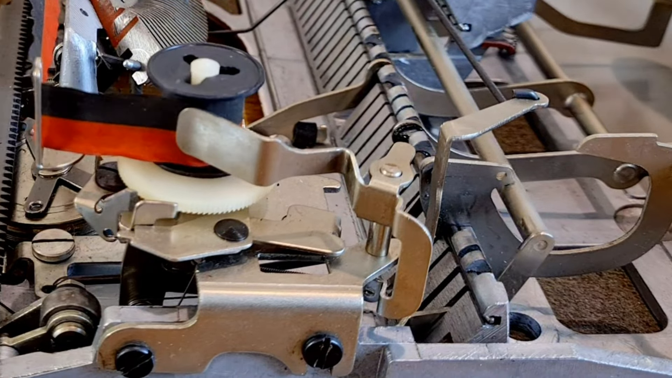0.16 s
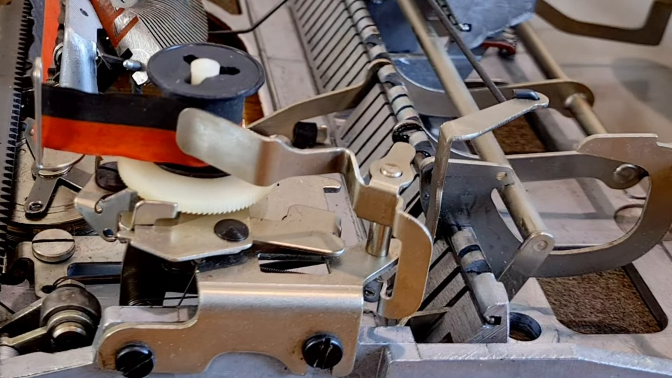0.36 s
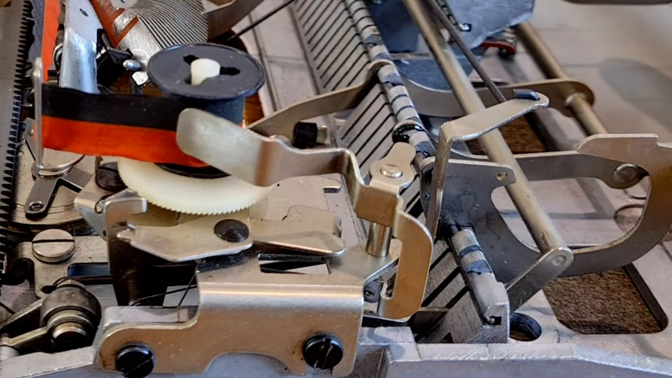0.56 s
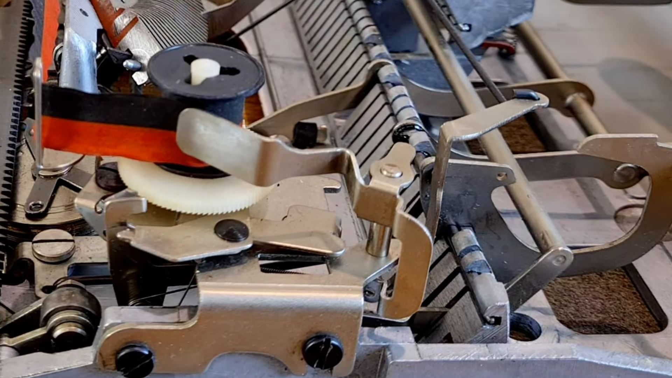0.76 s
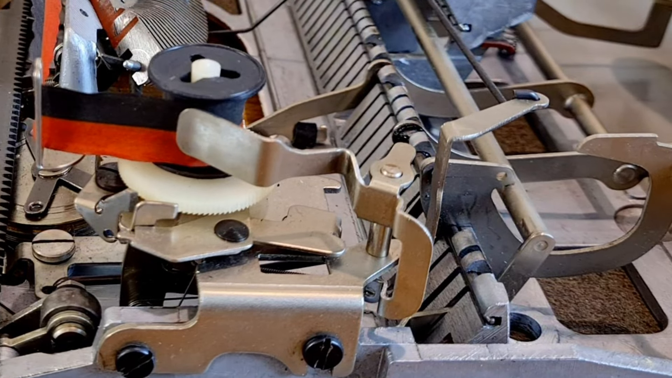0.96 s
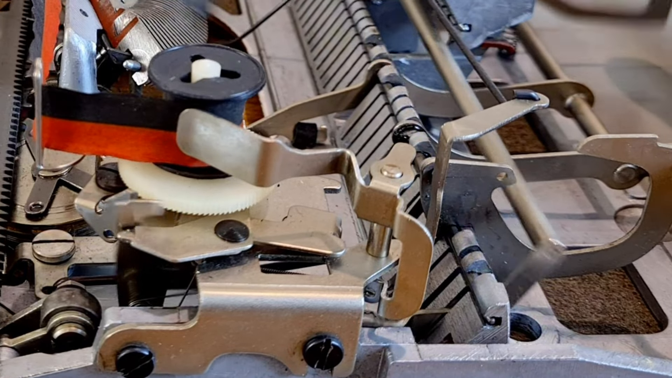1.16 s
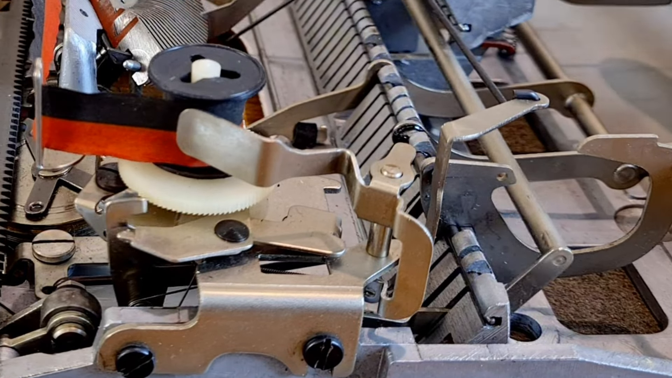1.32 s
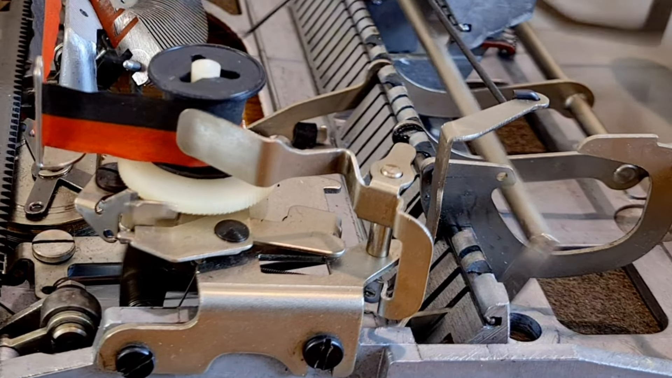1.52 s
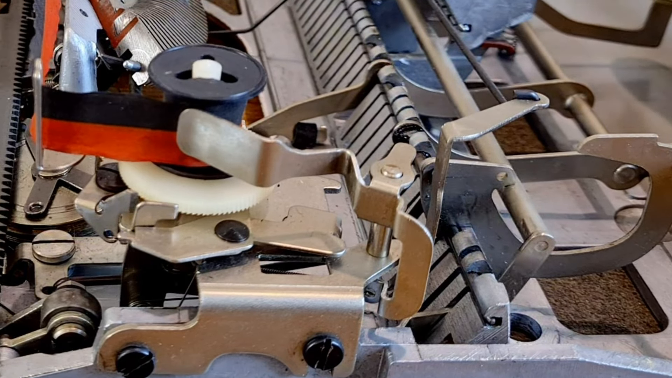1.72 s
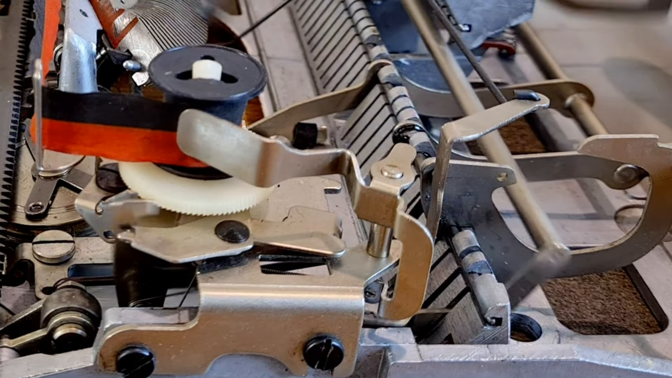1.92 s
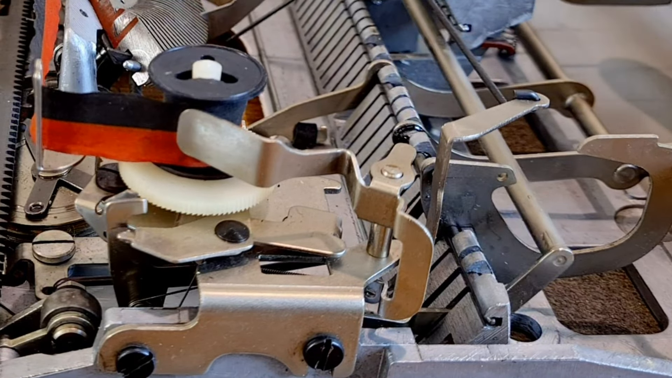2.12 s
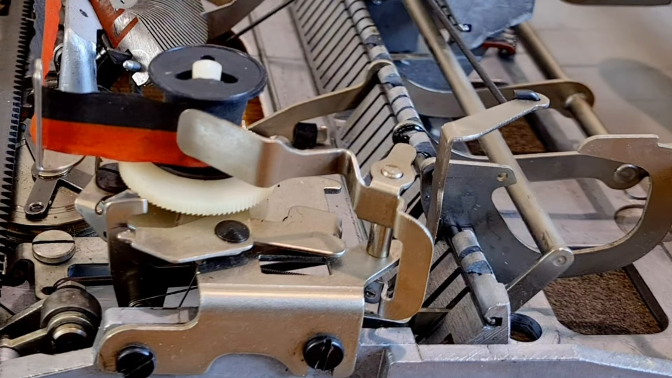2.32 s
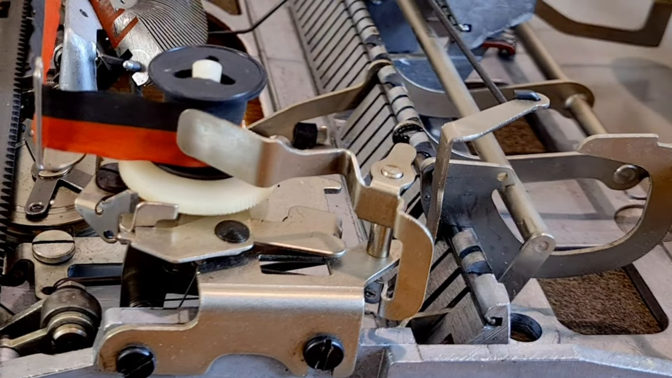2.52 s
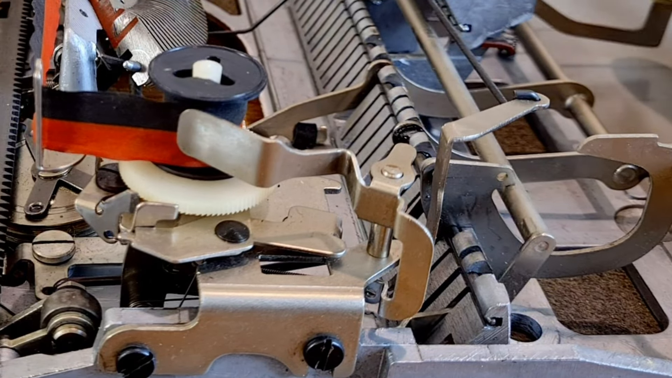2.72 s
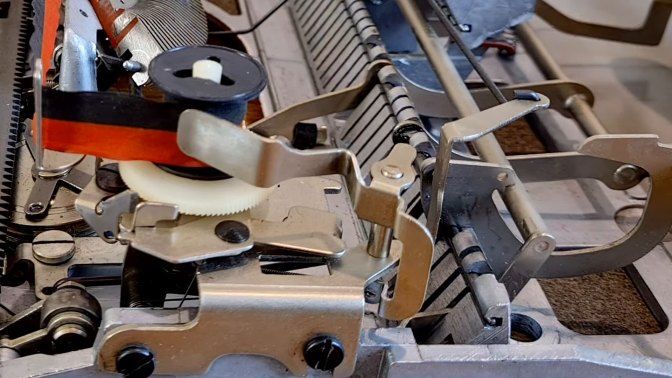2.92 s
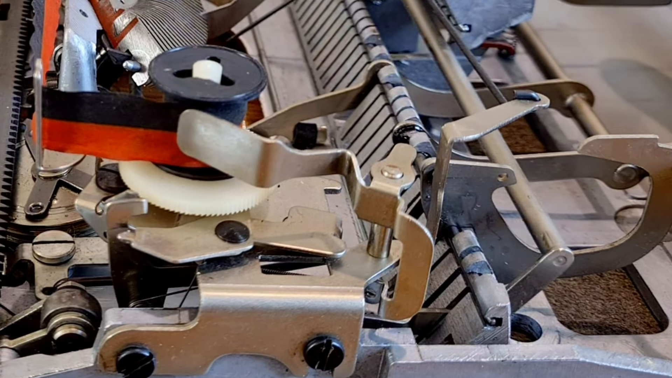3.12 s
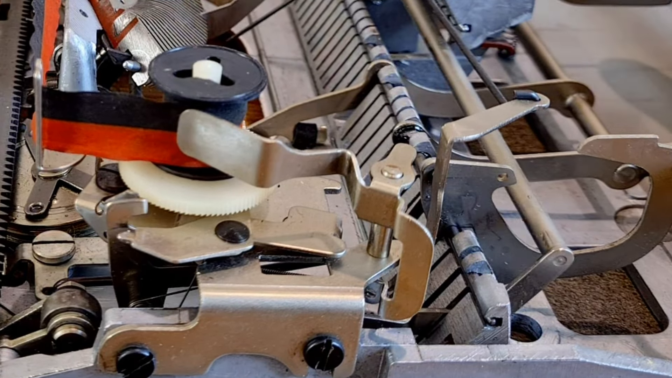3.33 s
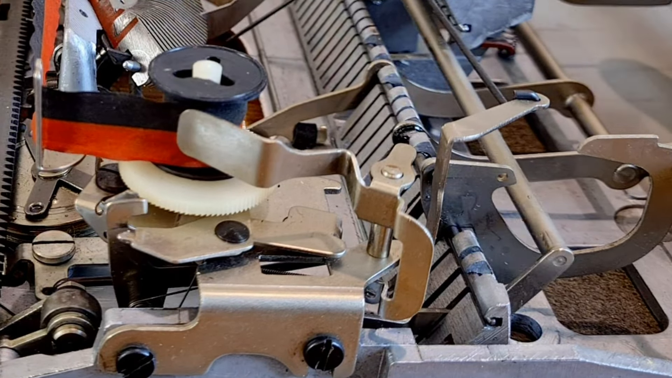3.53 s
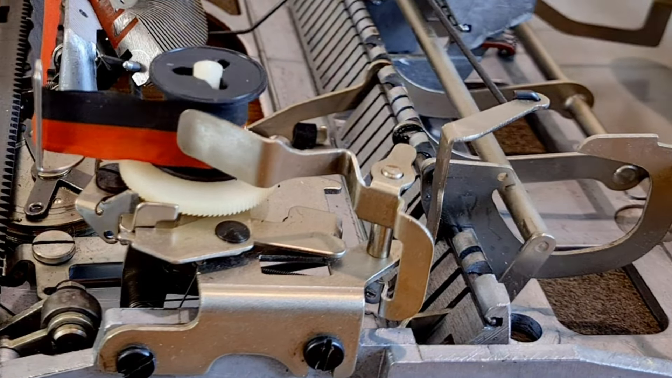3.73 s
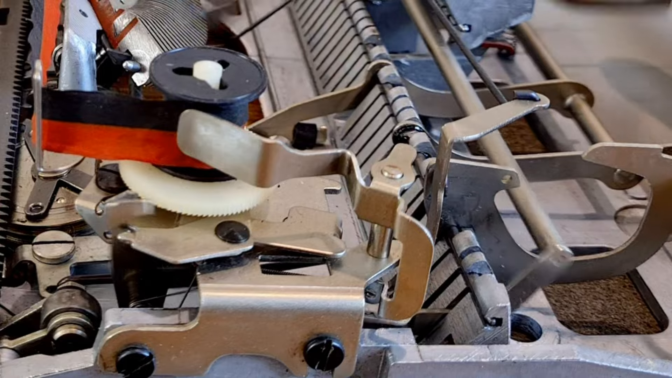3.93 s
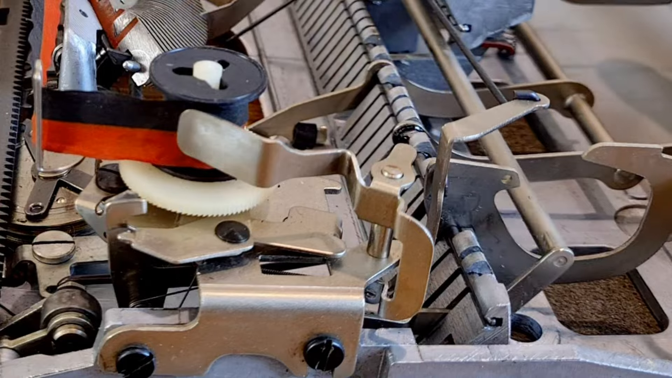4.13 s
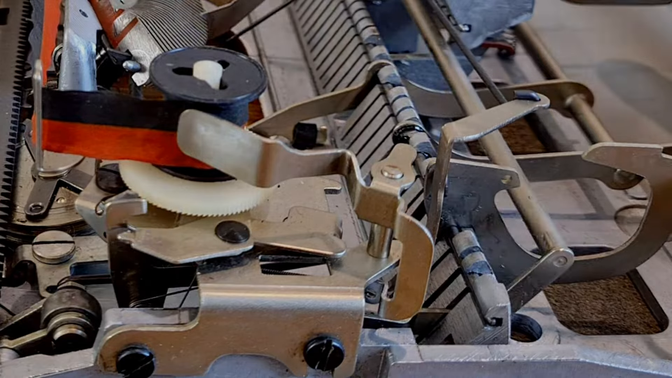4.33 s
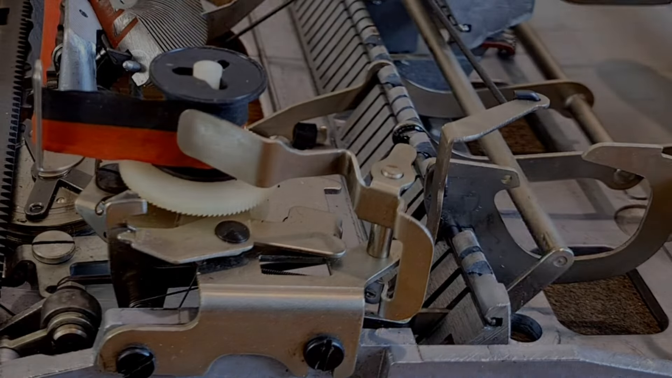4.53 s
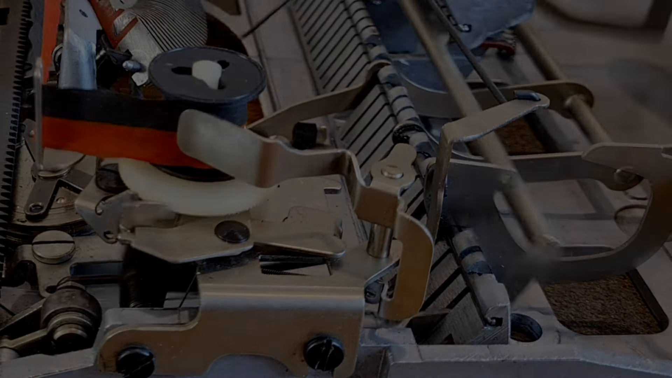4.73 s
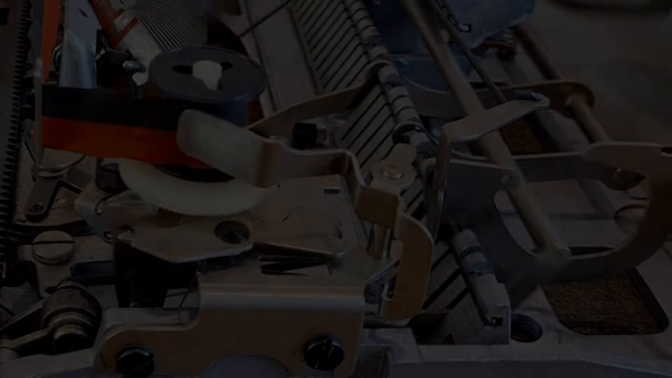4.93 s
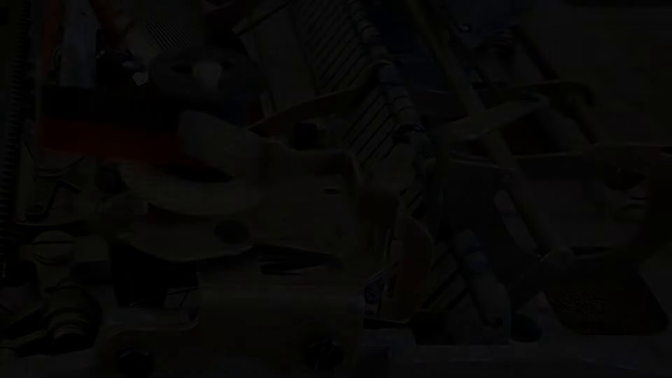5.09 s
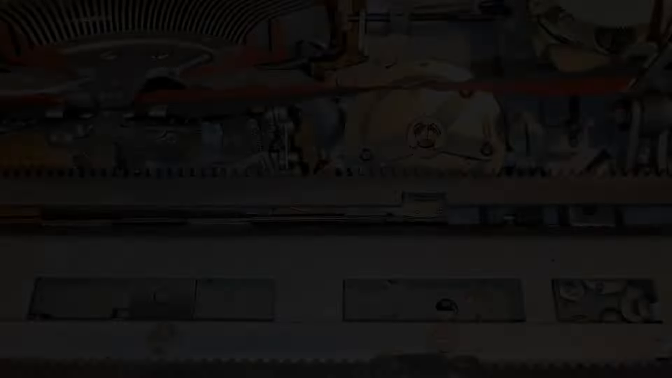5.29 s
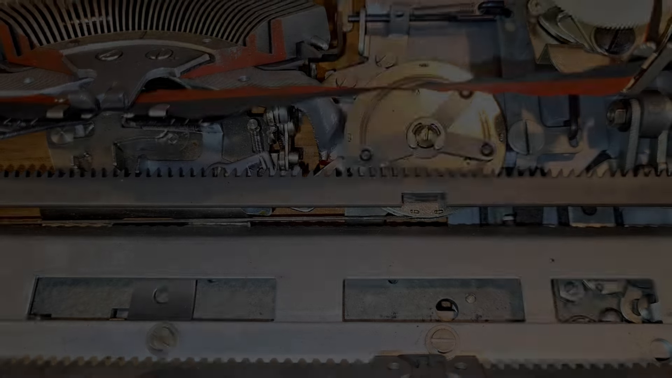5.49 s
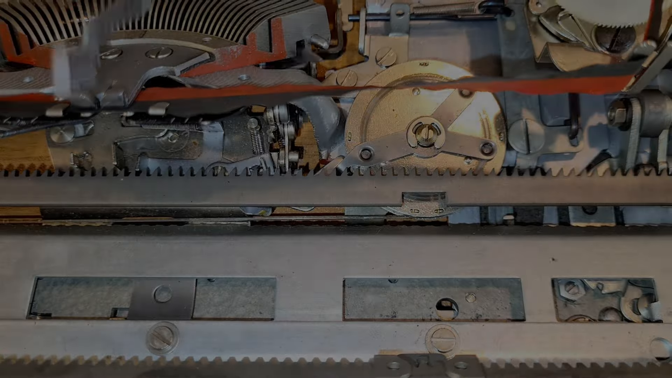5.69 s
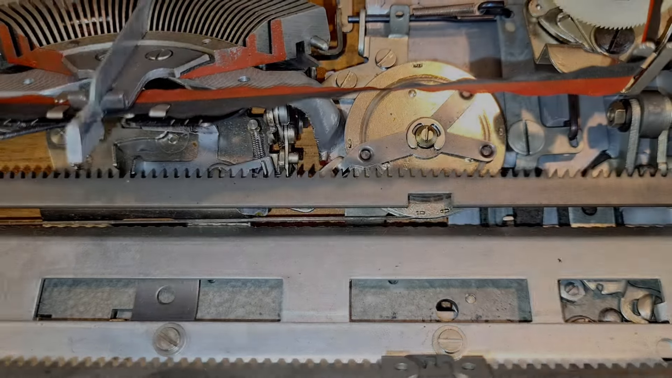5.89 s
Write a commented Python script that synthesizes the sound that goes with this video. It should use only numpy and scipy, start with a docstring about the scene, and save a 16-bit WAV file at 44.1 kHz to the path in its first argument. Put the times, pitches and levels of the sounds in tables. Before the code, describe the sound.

A manual typewriter heard very close in a live room. Six key presses, spaced unevenly from under a second to over a second, each give a tiny scrape, a quick tick and a hard bright clack, then a softer cluster of clicks as the typebar drops back. After a dull bump near five seconds, loose parts rattle and one weaker clack lands. Low rumble and very faint hiss lie beneath.

```python
"""A manual typewriter up close

A typewriter clacks indoors over a low rumble and a faint hiss. Each key press takes up the linkage, trips
the escapement and throws a typebar against its stop; on release the parts click back and drop onto their rest.
Each contact is a short push of noise that rings five groups of parts, and loose steel chatters after it.
The linkage rubs as gritty noise, one dull thud is a damped swing, and the room answers with fading noise."""
import sys
import numpy as np
from scipy import signal
from scipy.fft import rfft, irfft, next_fast_len
from scipy.io import wavfile
from scipy.ndimage import uniform_filter1d, map_coordinates

SR = 44100
rng = np.random.default_rng(int(sys.argv[2]) if len(sys.argv) > 2 else 0)


def output_pcm(signal):
    """Save a mono or channel-first signal as 16-bit PCM at the path in sys.argv[1].

    Samples are clipped to [-1, 1] before scaling.
    """
    pcm = np.clip(np.atleast_2d(signal).T, -1, 1) * 32767
    wavfile.write(sys.argv[1], SR, np.round(pcm).astype(np.int16))


N = 266893  # length in samples

# What rings. Each row is one resonance: pitch in Hz, width in Hz, strength in dB within its group.
# The typebars and the segment:
CLACK = [(866, 140, -14), (1160, 83, -9), (1327, 110, -16.5), (1941, 484, 9), (1940, 79, -11),
         (2182, 120, -5.5), (3080, 740, 0)]
# The levers, same columns:
RING = [(3370, 330, -4), (4297, 710, 2.5), (5640, 1100, 0), (6936, 880, 1.5)]
# The links and springs, same columns:
SIZZLE = [(8596, 910, -5), (10475, 1300, 0.5), (11210, 950, 1.5), (13700, 1900, -4), (14220, 380, -4),
          (16500, 2000, 2.5)]
# The frame, same columns:
KNOCK = [(258.8, 60, 2), (486, 42, 0), (650, 130, -7.5), (842, 60, -8.5), (846, 8.8, -2.5), (977, 28, 3),
         (1055, 35, 4), (1226, 35, 3.5), (1218, 51, 7), (1685, 420, -11), (2200, 590, -10.5),
         (2350, 48, -1.5), (2523, 25, -2.5), (2650, 240, -9.5)]
# The desk, same columns; the strengths are varied at random at every blow:
THUMP = [(85.53, 7.8, -7), (110.8, 26, -1), (142, 82, -5), (238, 16, -7.5), (320.4, 14, 2)]

# Echo of the room. Each row: frequency in Hz, time to fall by 60 dB in seconds, strength in dB.
ROOM = [(149, .5, -1), (491.8, 0.41, 0), (1080, 0.39, -2.5), (1608, 0.59, -12), (2190, 0.65, -14.5),
        (2440, 0.67, -12.5), (3800, 0.54, -8.5), (7950, 0.49, -15.5), (10450, 0.33, -10),
        (17100, 0.94, -37.5)]
# How alike left and right are in the direct sound. Each row: frequency in Hz, likeness (1 = identical).
NEAR_LIKENESS = [(100, .97), (300, .75), (2000, .85), (3500, .6), (6000, 0), (16000, 0)]
# The same for sound from all around. Each row: frequency in Hz, likeness (1 = identical).
FAR_LIKENESS = [(60, 1), (240, 0.92), (950, 0.19), (3770, 0.1), (15000, 0.34)]
# The two microphone ports. Each row: frequency in Hz, left over right in dB, lead of the left in radians.
PORTS = [(300, 0, 0), (800, 0, -.3), (2000, 2, .6), (3500, 0, .5), (5000, -4, 0), (8300, 5, 0),
         (12000, 0, 0), (16000, -3, 0)]
# Where the machine stands. Each row: time in seconds, left over right in dB.
SIDE = [(0, -1.5), (5.1, -.5), (5.2, -1), (5.55, 4), (6.05, 4)]

# Loudness of the rumble, before it wavers. Each row: time in seconds, level in dB.
RUMBLE_LEVEL = [(0, -51.5), (.9, -58.5), (1.6, -55.5), (2.3, -58.5), (3.6, -58), (4.8, -57.5), (5.3, -51.5),
                (6.05, -57)]
# Loudness of the hiss. Each row: time in seconds, level in dB.
HISS_LEVEL = [(0, -83), (5.15, -83), (5.2, -76), (6.05, -78)]
# Tone colour of the rumble. Each row: frequency in Hz, relative strength in dB per Hz.
RUMBLE_COLOUR = [(13, -49.5), (33, -28), (38, -10.5), (81, -7.5), (130, -16.5), (173, -16), (237, -26.5),
                 (345, -26), (432, -39), (709, -60.5), (800, -62.5), (1040, -100), (1760, -120)]
# Tone colour of the hiss. Each row: frequency in Hz, relative strength in dB per Hz.
HISS_COLOUR = [(350, -27.5), (600, -2), (760, -15.5), (803, -9), (1100, -6), (1870, -12), (3260, -9),
               (3740, -7.5), (5220, -18), (11700, -16.5), (16500, -49.5)]

# The linkage rubs as a key goes down or comes back. Each row: start in seconds, end in seconds, end level in dB.
RUBS = [(.005, 0.12, -50), (.395, 0.405, -50), (.41, 0.473, -42), (.742, 0.823, -53.5), (1.108, 1.128, -52),
        (1.125, 1.18, -47.5), (1.462, 1.527, -50), (1.824, 1.846, -56.5), (1.843, 1.904, -46.5),
        (2.43, 2.5, -56), (2.938, 2.972, -60), (2.968, 3.02, -44.5), (3.535, 3.599, -53.5),
        (3.799, 3.861, -46), (3.865, 3.924, -46.5), (4.65, 4.729, -49.5), (4.87, 4.931, -50),
        (5.521, 5.592, -67), (5.695, 5.733, -47.5)]
RUB_GROWS_DB_PER_S, RUB_START_S = 193, 0.012  # friction builds under the load, after a soft start

# Contacts of each kind. Each row: start in seconds, clack level in dB, extra ring and sizzle in dB.
# Slack leaves the linkage:
TAKE_UPS = [(.0067, -63, -3.5), (.047, -64, -8), (.0644, -66, 8), (.7515, -56, 3.5), (.776, -62, -5.5),
            (.795, -53.5, 6.5), (1.4703, -71, -7.5), (1.4915, -46.5, 3), (2.417, -72.5, 3.5),
            (2.449, -58, -1.5), (2.469, -43, 3), (3.5457, -50.5, 4), (3.5624, -51.5, 1),
            (3.5811, -55, 19.5), (4.6604, -54.5, 0), (4.6775, -69, 5.5), (4.6979, -41.5, 5.5),
            (5.4918, -63.5, 6), (5.514, -62, 6.5), (5.5565, -63.5, -6), (5.5779, -58, 9)]
# The escapement lets go, same columns:
TRIPS = [(.088, -28.5, 0.5), (.8128, -29, 1), (1.5095, -29.5, 0.5), (2.4842, -26.5, -1.5),
         (3.5955, -24.5, -3.5), (4.7128, -30.5, 3)]
# The typebar meets its stop, same columns, then contact time in milliseconds:
STRIKES = [(.102, -17.5, 3, 2.1), (.8253, -14, -1, 2.3), (1.5236, -15.5, 3, 1.3), (2.4969, -13.5, 0, 1.9),
           (3.6077, -11, 0.5, 1.21), (4.7195, -17.5, 2.5, 1), (4.7454, -24.5, 5.5, 0.49),
           (5.708, -21.5, -4.5, 0.79)]
# The typebar bounces. Each row: start in seconds, clack level in dB, extra ring and sizzle in dB.
REBOUNDS = [(.108, -36, -8), (.1182, -40.5, -1), (.837, -31, 1.5), (.84, -38, -2), (1.5385, -34, 1),
            (2.511, -30, 0), (3.613, -26.5, 0), (3.6235, -36.5, -3), (4.724, -47.5, 16.5), (5.7115, -36, 8),
            (5.7171, -32, -2.5), (5.7245, -39.5, -2.5), (5.73, -47, -8)]
# Levers fall back, same columns:
CLICKS = [(.4071, -45, 0.5), (.4345, -40.5, -3.5), (.45, -42.5, -3), (.4884, -43, -6), (1.1233, -47.5, 3.5),
          (1.149, -47.5, 3.5), (1.1616, -41, -2.5), (1.2, -40, -4), (1.8402, -45, 0), (1.8695, -43, -4),
          (1.881, -43, -4.5), (2.96, -56.5, 7.5), (2.9675, -45, -0.5), (2.9925, -51, 9), (3.001, -43, -0.5),
          (3.0432, -41.5, -5), (3.8332, -49, -5), (3.861, -38.5, -1.5), (3.8834, -53.5, 11),
          (3.9034, -45.5, 1), (4.8835, -46.5, -1), (4.9, -48, 2), (4.9101, -49.5, 1), (4.9738, -49.5, -14)]
# A sprung pawl snaps over, same columns, then contact time in milliseconds:
SNAPS = [(.4228, -41, 0, 1.02), (1.1358, -43, -2.5, 1.7), (1.8565, -42.5, 1, 1.27),
         (2.9825, -40.5, -0.5, 1), (3.8526, -50.5, 2.5, 1.3), (3.9414, -50, 6, 3.3), (3.9617, -54.5, 2, 3),
         (3.9865, -62, 4.5, 2.4), (4.021, -61, -2, 1.9), (5.7426, -62, 11.5, 2.2)]
# The typebar drops onto its rest. Each row: start in seconds, clack level in dB, extra ring and sizzle in dB.
LANDINGS = [(.4665, -27.5, -0.7), (1.1803, -27, -2), (1.8977, -26.5, -0.75), (3.0149, -24, 0.96),
            (3.9241, -29.5, 0.086), (4.9282, -31, 0.57)]
# Loose parts shake, same columns:
RATTLES = [(4.7797, -38, 2.5), (4.7838, -40.5, 4.5), (4.7971, -38, -2), (4.8308, -54, 3), (4.836, -43, 4),
           (4.8451, -42.5, -3), (4.8589, -50, 5), (5.5922, -41, -5), (5.6155, -50, -5), (5.6312, -44, 2.5),
           (5.6482, -49, 0)]
# Dull bumps against the frame, same columns:
BUMPS = [(5.202, -48, -7.5), (5.2239, -54, 1.5)]
# How each kind sounds. Each row: its table, then ring, sizzle, knock and thump in dB counted from the clack,
# then contact time in milliseconds (None where every contact has its own).
KINDS = [(TAKE_UPS, -12.5, -12.5, -13.5, -13, 2.8), (TRIPS, -.3, .4, -32.5, -28, 1),
         (STRIKES, -7, 1.9, -25.5, -26, None), (REBOUNDS, 0.21, 6.8, -3.5, -7, 2.2),
         (CLICKS, 1.1, -2.5, -.4, -6, 2.1), (SNAPS, 10, 11, 5, -5, None),
         (LANDINGS, -5, -2, -1.8, -17.5, 1.566), (RATTLES, -0.34, .3, -16, -11, 2.18),
         (BUMPS, -10, -34, -1.3, -1.5, 0.88)]

# A dull knock on the desk. In order: start in seconds, level in dB, pitch in Hz,
# damping in Hz (twice the width of the resonance).
THUD = (5.2022, -32, 150, 110)
TOP_HZ = 15800  # the sound ends around here


def amp(db):
    """Turn decibels into a plain factor."""
    return 10 ** (np.asarray(db) / 20)


def unit(x):
    """Scale a signal to an average (RMS) strength of 1."""
    return x / np.sqrt(np.mean(x ** 2) + 1e-20)


def along(hz_points, values, hz):
    """Read values between points on a log frequency axis."""
    return np.interp(np.log(hz + 1), np.log(np.add(hz_points, 1)), values)


def curve(rows):
    """Draw straight lines through (seconds, value) rows, one value per sample."""
    return np.interp(np.arange(N) / SR, *np.transpose(rows))


def filtered(x, response):
    """Change the strength and timing of each frequency in x by a response."""
    size = next_fast_len(x.shape[-1] + 4096)  # spare room for ringing at the end
    hz = np.fft.rfftfreq(size, 1 / SR)
    return irfft(rfft(x, size) * response(hz), size)[..., :x.shape[-1]]


def resonances(modes, hz):
    """Response of parts that ring after a push, falling steeply outside their range."""
    above = 1j * hz / (1.3 * modes[-1][0])
    below = 1j * hz / (.7 * modes[0][0])
    edges = below ** 2 / (1 + below + below ** 2) / (1 + above + above ** 2)
    total = 0
    for k, (centre, width, db) in enumerate(modes):
        swing = 1j * hz * width / (centre * centre - hz * hz + 1j * hz * width)
        total = total + (-1) ** k * amp(db) * swing  # the sign alternates from row to row
    return edges * total


def stereo_noise(likeness, size):
    """Mix a shared and an opposed noise so that left and right are as alike as asked."""
    def mix(hz):
        alike = along(*np.transpose(likeness), hz)
        turn = np.arccos(np.clip(alike, -1, 1)) / 2
        return np.array([np.cos(turn), np.sin(turn)])

    mid, side = filtered(rng.standard_normal((2, size)), mix)
    return np.array([mid + side, mid - side])


def coloured_noise(colour):
    """Wide noise whose frequencies are weighted by a colour table."""
    noise = stereo_noise(FAR_LIKENESS, size=N)
    return unit(filtered(noise, lambda hz: amp(along(*np.transpose(colour), hz))))


def background(wavers_per_s=6, waver_db=2.5):
    """A wavering low rumble, nearly mono, and a faint wide hiss, both shaped from noise."""
    steps = np.arange(N) * wavers_per_s / SR
    # a smooth curve through random points
    waver = map_coordinates(rng.standard_normal(int(N * wavers_per_s / SR) + 4), [steps])
    rumble = amp(curve(RUMBLE_LEVEL) + waver_db * waver) * coloured_noise(RUMBLE_COLOUR)
    hiss = amp(curve(HISS_LEVEL)) * coloured_noise(HISS_COLOUR)
    return rumble + hiss


def linkage(bright_db=-4, grit_db=4):
    """Levers rub on their pivots: gritty noise rings the metal, growing until each rub stops."""
    t = np.arange(N) / SR
    level = 0
    for start, end, db in RUBS:
        growth = amp(db - RUB_GROWS_DB_PER_S * abs(end - t))
        soft_start = np.clip((t - start) / RUB_START_S, 0, 1) ** 2
        level = level + growth * soft_start * (t < end)
    grit = amp(grit_db * unit(uniform_filter1d(rng.standard_normal(N), size=90)))

    def colour(hz):
        bright = resonances(RING, hz) + amp(-4.5) * resonances(SIZZLE, hz)
        return resonances(CLACK, hz) + amp(bright_db) * bright

    rubbing = stereo_noise(NEAR_LIKENESS, size=N) * grit
    return level * unit(filtered(rubbing, colour))


def contacts(chatter_db=-18, chatter_s=0.12, grit_db=5):
    """Each contact is a burst of micro-impacts; loose parts chatter on, and five groups of parts ring."""
    out = np.zeros((2, N + SR))
    t = np.arange(8192) / SR
    hz = np.fft.rfftfreq(len(t), 1 / SR)
    metal = np.array([resonances(modes, hz) for modes in (CLACK, RING, SIZZLE, KNOCK)])
    fade = np.minimum(1, 4 * (1 - t / t[-1]))  # over the last quarter
    start = slice(SR // 40)  # the first 25 ms
    for rows, ring_db, sizzle_db, knock_db, thump_db, kind_ms in KINDS:
        for s, db, bright_db, *own_ms in rows:
            contact_ms = max(*(own_ms or [kind_ms]), .2)
            u = t / (contact_ms / 1000)  # time counted in contact times
            blow = u * np.exp(1 - u) * (1 - np.exp(-u ** 2 * 8.3))
            uneven = amp(grit_db * unit(uniform_filter1d(rng.standard_normal(len(t)), size=60)))
            # the chatter falls by 60 dB in chatter_s
            chatter = amp(chatter_db - 60 * t / chatter_s) * uneven * (1 - np.exp(-u))
            push = blow + chatter
            impacts = rfft(stereo_noise(NEAR_LIKENESS, size=len(t)) * push) * metal[:, None]
            # new strengths for the desk at every blow, varied by about 2 dB
            desk = resonances(THUMP + rng.standard_normal((len(THUMP), 1)) * [0, 0, 2], hz)
            # the desk feels the whole push, not its grain
            shove = -rfft(push) * desk * np.ones((1, 2, 1))
            rung = irfft(np.concatenate([impacts, shove]), len(t))
            # at first, each group gives back the energy of the blow
            rung_strength = np.linalg.norm(rung[..., start], axis=-1, keepdims=True)
            rung = rung * np.linalg.norm(push[start]) / rung_strength
            group_db = np.array([0, ring_db + bright_db, sizzle_db + bright_db, knock_db, thump_db])
            contact = np.tensordot(amp(db + group_db), rung, axes=1)
            out[:, round(s * SR):][:, :len(t)] += contact * fade
    return out[:, :N]


def room(x):
    """Echo as fading noise: each frequency dies at its own speed, with a fresh tail every third of a second."""
    hz_points, t60, db = np.transpose(ROOM)
    out = np.zeros((2, N + 2 * SR))
    step = SR // 3
    for start in range(0, N, step):
        hz, t, tail = signal.stft(stereo_noise(FAR_LIKENESS, size=2 * step), SR, nperseg=256)
        decay_s = along(hz_points, t60, hz)[:, None]
        tail = tail * amp(along(hz_points, db, hz)[:, None] - 60 * t / decay_s)
        tail = tail / np.sqrt(decay_s * SR / np.log(10 ** 6))  # long tails get no extra energy
        echo = signal.istft(tail, SR, nperseg=256)[1]
        wet = signal.fftconvolve(x[:, start:start + step], echo, axes=1)
        out[:, start + 200:][:, :wet.shape[1]] += wet  # 200 samples (4.5 ms) late
    return out[:, :N]


def ports(x):
    """The two microphone ports hear the near machine with different colour and timing."""
    hz_points, db, lead = np.transpose(PORTS)

    def half(hz):  # half the difference goes to each side
        level = amp(along(hz_points, db, hz) / 2)
        return level * np.exp(.5j * along(hz_points, lead, hz))

    return filtered(x, lambda hz: np.array([half(hz), 1 / half(hz)]))


def thud():
    """A dull knock on the desk: one soft blow as a low, heavily damped swing."""
    s, db, hz, damping = THUD
    t = np.maximum(np.arange(N) / SR - s, 0)
    swing = np.cos(2 * np.pi * hz * t) * np.exp(-np.pi * damping / 2 * t)
    soft_start = 1 - np.exp(-t / 0.00023)
    return -amp(db) * swing * soft_start


def scene():
    """Add up the background, the machine and its echo in the room."""
    behind = background()
    machine = linkage() + contacts() + thud()
    balance = amp(curve(SIDE) * [[.5], [-.5]])  # left up, right down by half each
    return behind + ports(machine) * balance + room(machine)


def record(dry):
    """The loudest peaks saturate softly; nothing is kept above the band limit."""
    soft = dry / (1 + abs(dry / .87) ** 4) ** (1 / 4)
    # fades out within 200 Hz on either side of the limit
    return filtered(soft, lambda hz: np.clip((TOP_HZ + 200 - hz) / 400, 0, 1) ** 2)


dry = scene()
out = record(dry)
output_pcm(out)
```